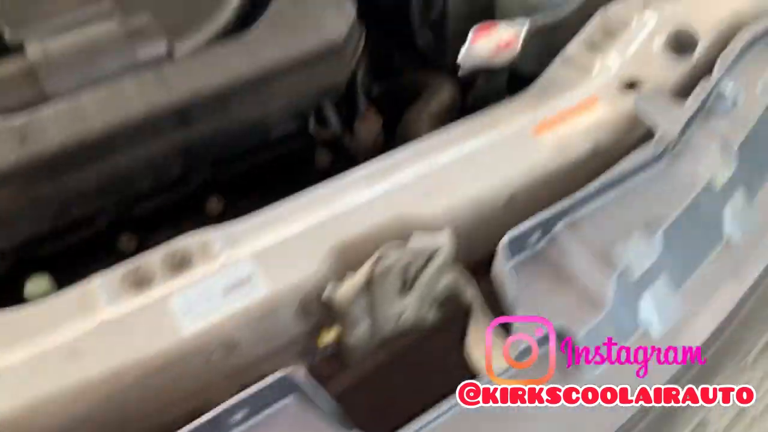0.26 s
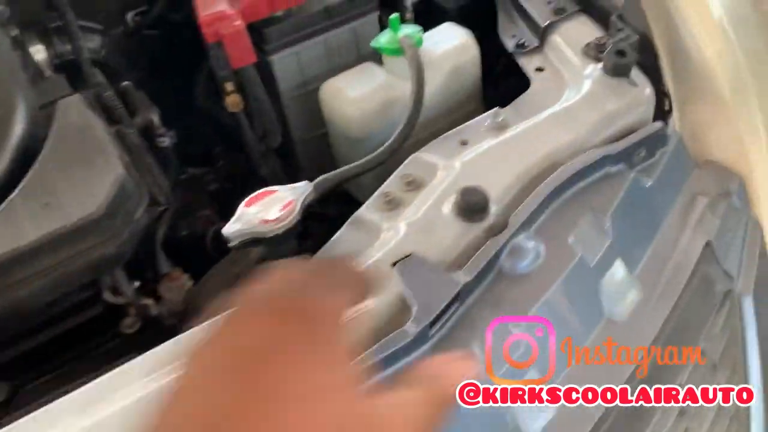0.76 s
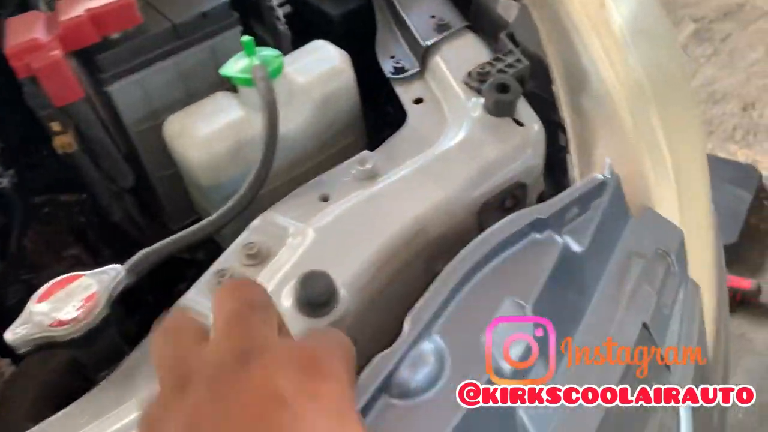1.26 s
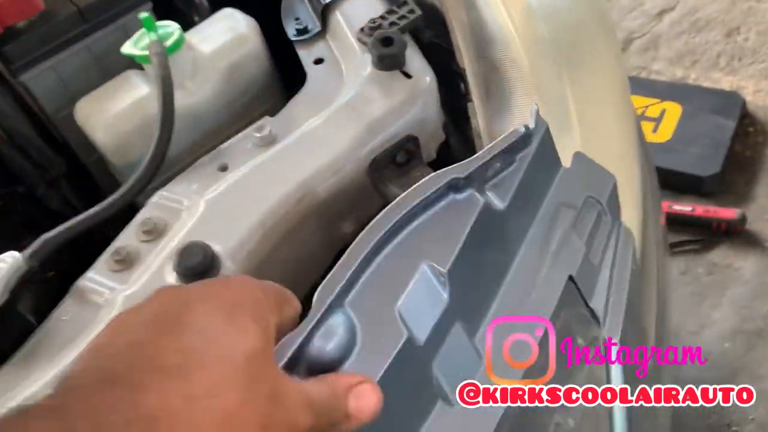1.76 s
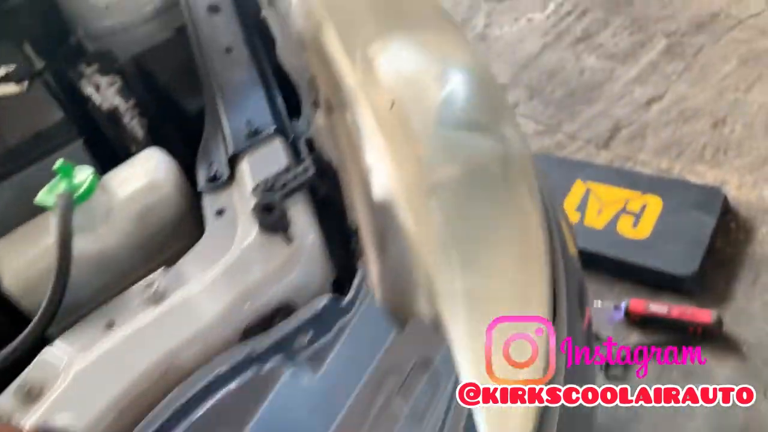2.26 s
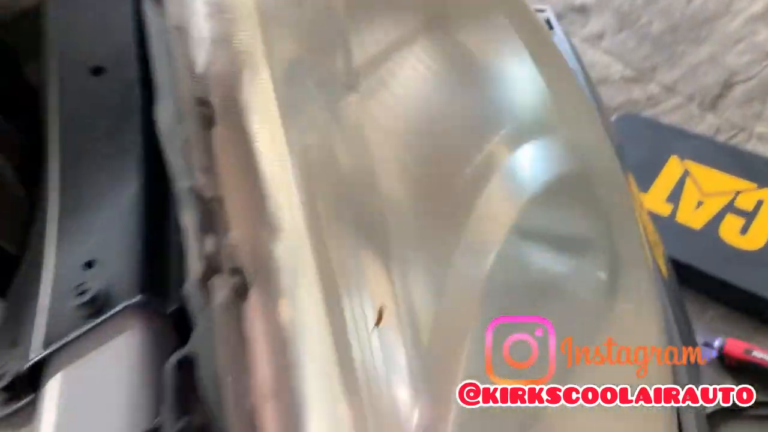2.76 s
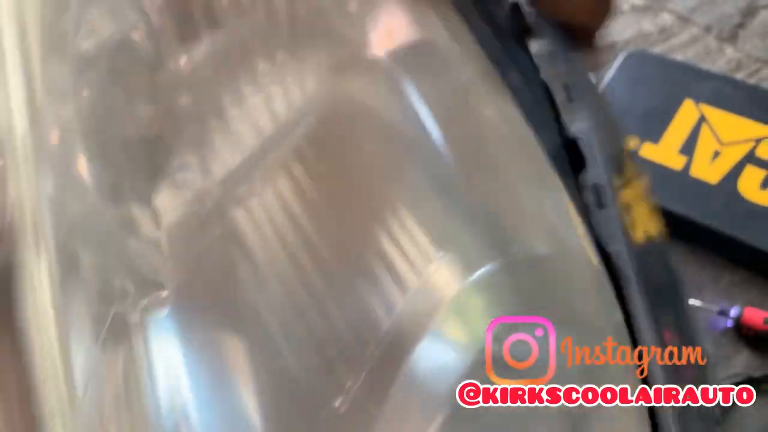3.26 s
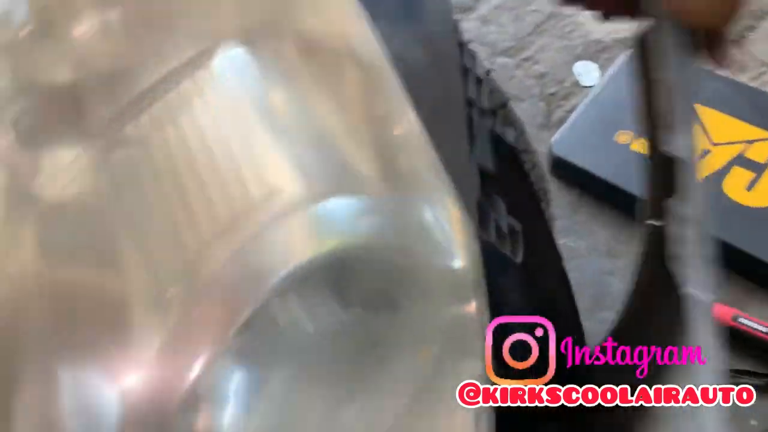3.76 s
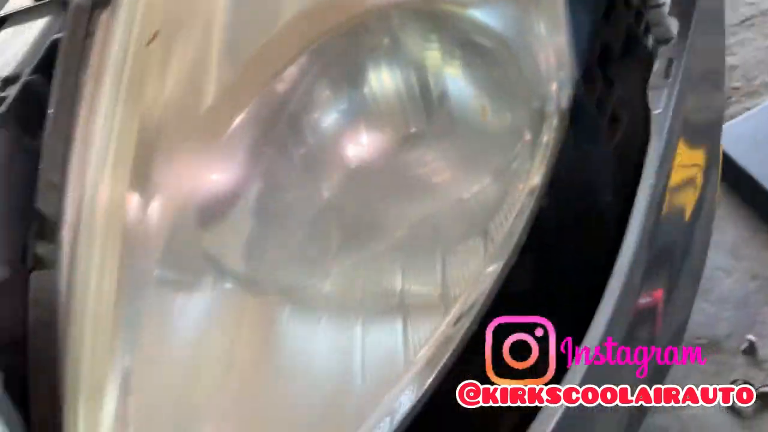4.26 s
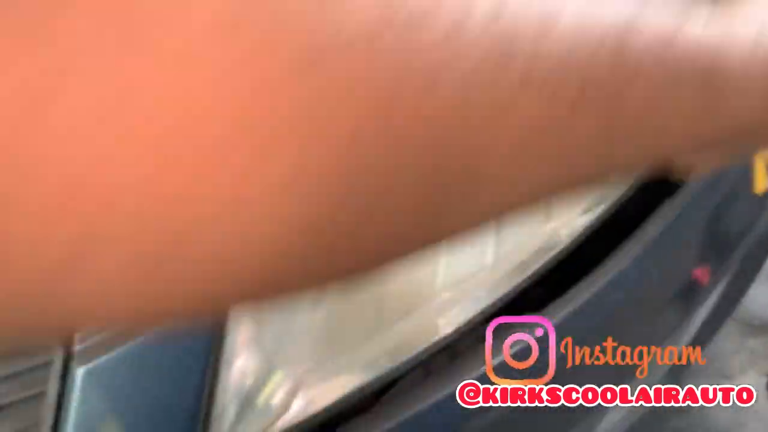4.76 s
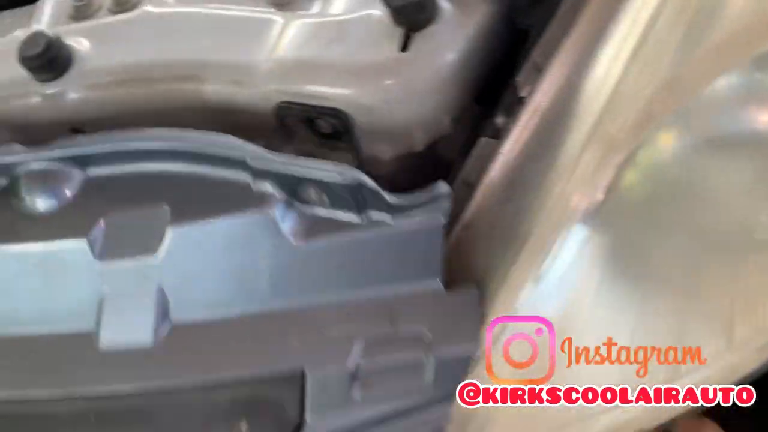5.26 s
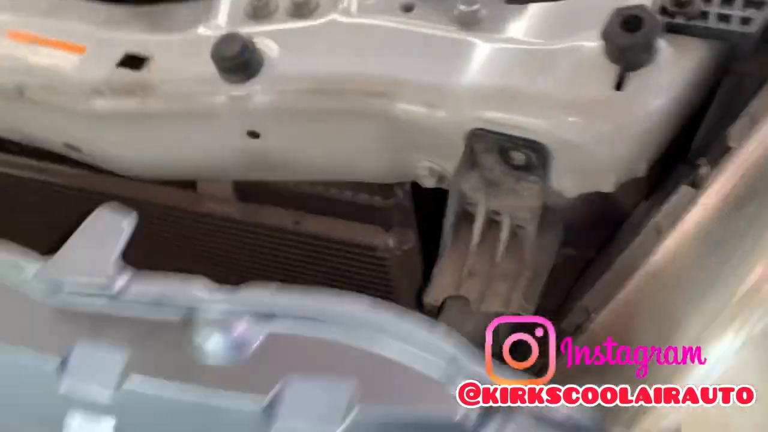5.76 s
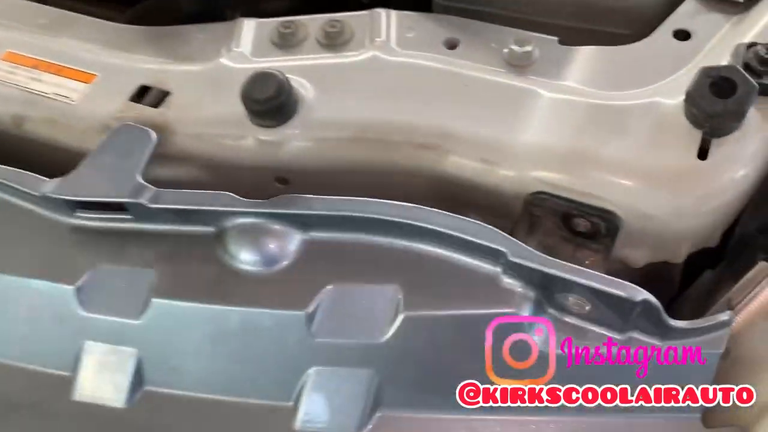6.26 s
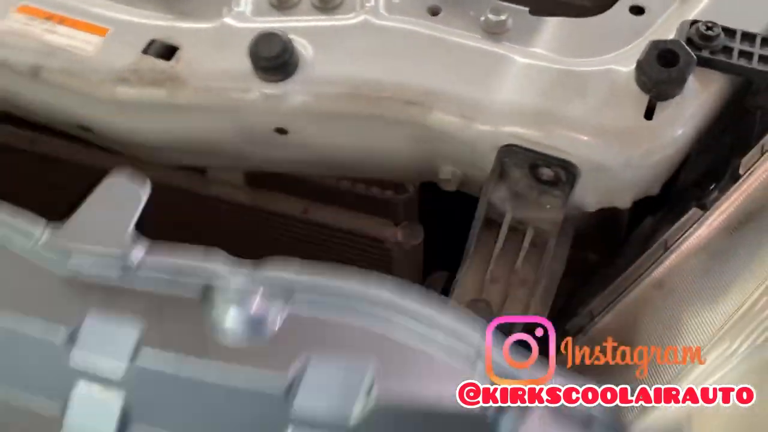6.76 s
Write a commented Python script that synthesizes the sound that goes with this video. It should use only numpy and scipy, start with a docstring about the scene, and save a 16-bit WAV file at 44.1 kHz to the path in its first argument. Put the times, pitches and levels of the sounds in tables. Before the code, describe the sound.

Stiff hollow plastic is handled right beside a small hand-held microphone in a workshop. Soft taps and faint scrapes give way to a thin squeaky rub and small finger ticks. Midway the panel clatters sharply in a fast irregular cluster, then a taut spot pops loudest of all. Later knocks are sparser, mixed with dull floppy thuds, cloth rustle and low rumble, with short reflections.

```python
"""Bumper cover worked loose

A plastic bumper cover is worked loose from its clips by hand in a garage, heard close up through a hand-held phone.
Clips snap and ring decaying shell modes, the loose panel flexes with falling low thumps and one tight pop,
edges scrape as coloured noise, and skin slips on smooth plastic in trains of tiny bursts that squeak or tick.
Handling rumble, rustling, a sleeve and quiet workshop air lie underneath, all of them filtered noise."""
import sys
import numpy as np
from scipy import signal
from scipy.fft import rfft, irfft
from scipy.io import wavfile
from scipy.ndimage import uniform_filter1d

SR = 44100
rng = np.random.default_rng(int(sys.argv[2]) if len(sys.argv) > 2 else 0)


def to_wav(sig):
    """Store sig (one row per channel, or 1-D mono) as 16-bit WAV at the path in sys.argv[1].

    Samples outside -1..1 are clipped; the rate is SR.
    """
    pcm = np.clip(np.atleast_2d(sig), -1, 1) * 32767
    pcm = np.round(pcm).astype(np.int16)
    wavfile.write(sys.argv[1], SR, pcm.T)  # frames by channels


N = 309141
TIME = np.arange(N) / SR
AGE = TIME[:SR // 2]  # seconds since the start of one event
FREQS = np.fft.rfftfreq(N, 1 / SR) + 1e-3

# How hard the cover is worked, as the level of its handling noise. Each row: time in seconds, level in dB.
EFFORT = [(0.0, -53), (0.76, -55.5), (0.94, -58), (1.4, -54), (2.75, -55), (2.96, -62), (3.2, -52.5),
          (3.35, -39), (3.46, -49), (3.57, -37.5), (3.72, -55), (3.84, -50.5), (4.27, -53.5), (4.62, -44),
          (4.76, -58.5), (5.24, -53.5), (5.42, -46.5), (5.69, -53.5), (6.08, -45.5), (7.0, -50)]
REST_DB = -55  # that level while the cover is only held
# Spectra of the noises. Each row: frequency in Hz, relative level in dB.
RUSTLE_COLOUR = [(300, -4.5), (700, -2.5), (1100, -6), (1500, -6.5), (2500, -14.5), (3800, -22.5),
                 (5500, -47), (9000, -27.5)]
MURMUR_COLOUR = [(100, -10.5), (170, 2.5), (240, 5), (280, -0.5), (325, 7), (400, -4.5), (550, -5),
                 (900, -55.5)]
SLEEVE_COLOUR = [(1500, 3), (4500, -0.5), (7000, 3), (11000, 6.5), (13000, 4.5), (15500, -2)]
RUMBLE_COLOUR = [(20, -45.5), (32, -17), (45, 6), (62, 12), (85, 8.5), (125, 4.5), (170, -3.5), (300, -48)]
AIR_COLOUR = [(40, 10), (120, -6.5), (330, -14.5), (600, -7), (1200, -35), (2500, -16.5), (4000, -19),
              (5500, -25.5), (7000, -14), (9000, -85), (16000, -41)]
SCRAPE_COLOUR = [(120, -7), (300, 6), (700, 2), (1050, -5.5), (1500, -8), (2300, -12.5), (3800, -16.5),
                 (5500, -23), (9000, -36)]
SLIP_COLOUR = [(3000, -77), (5500, -31), (7500, -18.5), (9300, -3), (11000, 3.5), (12300, 2.5), (13500, 8),
               (15500, 0), (17000, 7.5)]
CRACK_COLOUR = [(300, -26), (800, 13), (1500, 3.5), (2400, 1), (4200, -17.5), (6000, -27), (12000, -17)]
SNAP_COLOUR = [(800, -6), (2500, 6.5), (4200, 4.5), (7000, 5), (11000, 7), (16000, -5)]
# The arm sweeping past the phone. Each row: centre in seconds, spread (sigma) in seconds, level in dB.
STROKES = [(0.45, 0.13, -62.5), (1.228, 0.019, -56.5), (1.324, 0.013, -59), (1.88, 0.15, -55.5),
           (2.877, 0.053, -52.5), (3.07, 0.05, -55.5), (3.993, 0.11, -53), (4.503, 0.14, -56),
           (4.837, 0.18, -50), (5.326, 0.061, -48.5), (6.42, 0.11, -54), (6.87, 0.091, -56)]
# Edges dragging over their brackets. Each row: centre in seconds, spread (sigma) in seconds, grind in dB
# and hiss in dB (both before trim), resonance of the edge in Hz, its level in dB.
SCRAPES = [(0.28, 0.036, -70, -50.5, 890, -82), (0.513, 0.021, -69, -53, 1000, -73),
           (0.693, 0.019, -43.5, -49.5, 1390, -72), (0.87, 0.031, -58, -55.5, 380, -48),
           (1.38, 0.024, -48.5, -78, 345, -40.5), (1.453, 0.016, -44, -51.5, 353, -44),
           (1.95, 0.027, -62, -72, 408, -53), (2.12, 0.042, -53.5, -63, 725, -60),
           (2.286, 0.014, -60, -62, 414, -50.5), (2.338, 0.011, -52, -66, 436, -52),
           (2.382, 0.018, -53, -47, 1800, -61), (3.279, 0.014, -44, -43, 596, -33),
           (3.53, 0.017, -42, -34, 3500, -52), (3.6, 0.0075, -48, -44, 600, -41),
           (3.776, 0.015, -40.5, -43, 2380, -55), (4.145, 0.022, -44.5, -53.5, 1610, -55.5),
           (4.214, 0.021, -66, -47.5, 1450, -45), (4.236, 0.035, -39, -44, 2040, -46.5),
           (4.454, 0.016, -47, -65, 950, -51), (4.524, 0.032, -35, -47, 1390, -54),
           (5.28, 0.024, -41, -57, 1090, -50.5), (6.115, 0.012, -46.5, -54.5, 1400, -72),
           (6.177, 0.015, -43, -63, 1430, -50), (6.661, 0.024, -43.5, -52, 1420, -63)]
# Clips and edges striking the shell. Each row: start in seconds, body level in dB, panel pitch in Hz, crack
# level in dB, snap level in dB, base ring time in seconds, pitch of the struck spot in Hz, its level in dB;
# levels are before each layer's trim, and body, crack and spot scale the ring time while the snap keeps its
# own.
KNOCKS = [(0.433, -56, 300, -40, -66, 0.062, 960, -46), (0.525, -56, 420, -33.5, -44, 0.028, 900, -51),
          (0.568, -33, 362, -35, -58, 0.034, 800, -27.5), (0.5799, -36, 398, -39, -40, 0.025, 1000, -43),
          (0.6544, -36, 330, -38.5, -38.5, 0.1, 2280, -32.5),
          (0.6596, -37, 382, -47, -54, 0.038, 1130, -53), (0.677, -41, 333, -62, -60, 0.11, 1280, -40),
          (0.703, -39.5, 490, -52, -56, 0.087, 925, -57), (1.137, -37.5, 332, -74, -78, 0.19, 644, -45),
          (1.211, -51, 314, -55, -57, 0.15, 3400, -62), (1.241, -69, 300, -50.5, -55, 0.073, 2950, -52),
          (1.369, -34.5, 312, -66, -72, 0.18, 610, -39), (1.4, -39.5, 292, -46, -74, 0.28, 1110, -57),
          (1.627, -39, 298, -70, -72, 0.25, 957, -43.5), (1.811, -42, 334, -46, -54, 0.09, 740, -37),
          (2.412, -56, 332, -53, -53.5, 0.12, 1005, -44.5), (2.817, -42, 329, -68, -65, 0.39, 590, -48),
          (3.2574, -50, 330, -47, -40, 0.03, 2650, -37), (3.268, -41, 500, -50, -40, 0.056, 2430, -39),
          (3.2949, -17, 336, -30, -27.5, 0.11, 700, -20.5),
          (3.3085, -19.5, 295, -36.5, -42, 0.17, 606, -23), (3.33, -28, 334, -42, -45, 0.12, 700, -36),
          (3.3437, -43, 395, -50, -46, .1, 604, -40), (3.394, -57, 320, -42.5, -41, 0.14, 1015, -34),
          (3.4401, -32, 333, -59, -66, 0.057, 630, -43), (3.492, -32.5, 294, -56, -37.5, 0.11, 640, -44),
          (3.516, -34, 313, -44, -56, .06, 700, -47), (3.5219, -40, 420, -46, -49, .04, 4200, -57),
          (3.5288, -26.5, 347, -49, -57, 0.084, 720, -31), (3.54, -29, 284, -55, -52, 0.15, 654, -41),
          (3.554, -29, 400, -46, -57, 0.078, 1430, -40), (3.5695, -26, 435, -31, -39, 0.097, 690, -20.5),
          (3.581, -28.5, 294, -41, -60, 0.11, 810, -29), (3.606, -35.5, 355, -44, -63, 0.068, 760, -43),
          (3.671, -38, 460, -35.5, -46, 0.039, 720, -19.5), (3.688, -41, 420, -53, -62, 0.051, 885, -32.5),
          (3.7382, -38.5, 684, -48, -37, 0.027, 4160, -39), (3.782, -29, 322, -44, -53, 0.2, 682, -33),
          (3.794, -37, 340, -49, -62, 0.097, 890, -46), (3.808, -31.5, 370, -43, -46.5, 0.055, 810, -31.5),
          (3.989, -29.5, 307, -37, -46, 0.19, 630, -37), (4.496, -23, 260, -23.5, -31, 0.075, 2310, -25.5),
          (4.5092, -36, 300, -31, -38, .06, 1450, -29), (4.526, -34.5, 347, -44, -46, .06, 810, -44),
          (4.599, -52, 400, -47, -59, 0.012, 3730, -41), (4.695, -33.5, 317, -28.5, -60, 0.12, 2210, -33.5),
          (5.3255, -27.5, 458, -34.5, -58, 0.11, 1450, -31), (5.3451, -32, 297, -38, -42.5, .05, 1730, -34),
          (5.356, -26.5, 331, -32, -44, 0.17, 820, -46), (5.392, -35.5, 294, -56, -62, 0.092, 600, -54),
          (5.787, -29.5, 492, -32, -47, 0.13, 1880, -35.5), (6.1502, -37, 458, -42, -48, 0.078, 1370, -37),
          (6.1591, -36.5, 350, -34.5, -29, 0.055, 1990, -44),
          (6.6965, -24.5, 454, -39, -56, 0.08, 1410, -28), (6.704, -32, 344, -49, -51, 0.093, 1960, -47),
          (6.717, -32, 235, -44, -64, 0.12, 1256, -43)]
# Shell resonances, before scatter and detuning. Each row: frequency in Hz, level in dB, t60 in seconds.
SHELL = [(183.6, 1, 0.48), (251.7, 8.5, 0.22), (300.3, 5, 0.38), (339, 4, 0.26), (431, 5, 0.12),
         (502, -1, 0.25), (582, -2.5, 0.063), (735, 2.5, 0.13), (838, 10, 0.02), (990, -6, 0.12),
         (995, 6, 0.0083), (1510, -4, 0.097), (2670, 15.5, 0.017), (2950, 15, 0.013)]
# A clip's own ring, before scatter and detuning. Each row: frequency in Hz, level in dB, t60 in seconds.
CLIP = [(1466, 5, 0.025), (1974, -4.5, 0.064), (2600, -3, 0.02), (3600, -3, .032), (4180, -2, 0.018),
        (6050, -2.5, 0.027), (7000, 0.5, 0.06)]
BITE_DB, BITE_S = 3, 0.00088  # the first contact of a blow is the hardest
PUSH_S, SETTLE_S = 0.065, 0.098  # force builds before a blow; the panel settles after it
# Second mode of a broad panel and of a small tab, as multiples of the first.
PANEL_OVERTONE, TAB_OVERTONE = 1.716, 1.573
# The loose panel flexing. Each row: start in seconds, level in dB before trim, first pitch in Hz,
# settled pitch in Hz, t60 in seconds.
THUMPS = [(0.439, -24, 111, 62, 0.12), (0.585, -24.5, 170, 105, 0.11), (0.844, -25.5, 270, 69.5, 0.098),
          (1.386, -28, 170, 112, 0.14), (1.952, -32, 149, 92.5, 0.11), (2.105, -35, 160, 100, 0.092),
          (2.274, -30, 169, 90, 0.16), (2.304, -40, 190, 99, 0.055), (2.817, -29, 621, 240, 0.17),
          (2.888, -22.5, 100, 64.4, 0.075), (3.128, -15.5, 89.5, 68.6, 0.064), (3.21, -20, 470, 149, 0.043),
          (3.33, -20, 200, 120, 0.05), (3.351, -19, 367, 250, 0.063), (3.373, -17, 150, 95, 0.062),
          (3.439, -37, 444, 233, 0.03), (3.515, -27, 220, 128, 0.052), (3.574, -19.5, 161, 80, 0.086),
          (3.825, -20.5, 153, 117, 0.048), (3.994, -20.5, 246, 99, 0.071), (4.497, -23.5, 280, 171, 0.064),
          (4.601, -15, 668, 83, 0.1), (4.656, -16, 230, 77, 0.068), (5.173, -31, 202, 106, 0.076),
          (5.367, -16.5, 205, 124, 0.042), (5.524, -21, 275, 102, 0.13), (5.602, -24, 109, 66.5, 0.086),
          (5.795, -16.5, 212, 90, 0.08), (5.899, -19.5, 204, 86, 0.12), (5.915, -13.5, 330, 108, 0.027),
          (6.0, -22.5, 101, 62, 0.14), (6.39, -29.5, 393, 256, 0.14), (6.725, -14, 137.4, 61.5, 0.05),
          (6.745, -16.5, 100, 68.4, 0.087), (6.916, -27, 119, 73.6, 0.066), (6.974, -29.5, 130, 107, 0.18)]
# Partials of a brief rubbing squeal. Each row: mid frequency in Hz, relative level in dB, rise in Hz per second.
SQUEAL = [(1540, 5, 3), (2270, 2, 9000)]
# Skin sliding on smooth plastic, one list per slide. Each row: time in seconds, slips per second,
# level in dB before trim.
SLIDES = [
    [(1.8, 970, -52), (1.86, 1400, -45), (1.9, 1850, -31.5), (1.96, 1500, -26.5), (2.03, 1400, -25),
     (2.08, 1640, -24), (2.13, 1440, -28), (2.17, 2300, -37.5), (2.2, 1560, -47), (2.27, 820, -57)],
    [(2.907, 240, -27), (2.922, 690, -25), (2.94, 860, -22.5), (2.962, 610, -28), (2.99, 180, -29.5),
     (3.015, 118, -33.5), (3.04, 117, -32.5), (3.066, 150, -27), (3.078, 104, -30)],
]
# Single slips. Each row: start in seconds, peak level in dB before trim, ring of the touched spot in Hz.
SLIPS = [(2.9028, -23, 11100), (3.085, -25, 10400), (3.1, -24, 10400), (3.1207, -22, 10500),
         (3.139, -24.5, 10800), (3.173, -24.5, 11500), (3.392, -23.5, 10900), (3.865, -25, 14900),
         (3.887, -26, 14800), (3.921, -27.5, 14800), (3.9476, -29, 14600), (3.9639, -27, 14500),
         (3.9758, -24.5, 14800), (3.989, -28, 14800), (4.022, -31, 14800)]
# A taut spot popping through: start in seconds, level in dB, first pitch in Hz, settled pitch in Hz, t60 in seconds.
POP = (4.6001, -4.5, 840, 560, .022)
# The left and right channels. Each row: frequency in Hz, left minus right in dB, left lead in radians.
STEREO_LEAN = [(20, 0, 0), (300, 0, .25), (540, 0, .95), (740, 6, 1.9), (860, 9, 1.3), (1000, 7, 0),
               (1250, 5, -1.3), (1700, 6, -.9), (2100, 10, -.7), (2400, 10, -3.9), (3100, 9, -3.7),
               (3700, 11, -6.2), (4500, 8, -6.2), (4850, 5, -9.3), (5300, 0, -9.6), (5800, 0, -12.1),
               (6600, 0, -12.7), (8500, 0, -15.7), (11000, 0, -18.85), (13400, 0, -22), (15500, 0, -25.1)]
TOP_HZ = 15750  # upper limit of the sound


def undb(db):
    """Decibels to gain."""
    return 10 ** (np.asarray(db) / 20)


def unit(x):
    """Scale to rms 1."""
    return x / np.sqrt(np.mean(x ** 2) + 1e-20)


def loudest(x):
    """Scale so that the loudest 10 ms have rms 1."""
    return x / np.sqrt(uniform_filter1d(x ** 2, SR // 100).max())


def add(out, s, x):
    """Mix x into out from time s."""
    i = max(int(s * SR), 0)
    out[i:i + len(x)] += x[:max(N - i, 0)]


def colour(x, points):
    """Causal minimum-phase filter with the spectrum of (Hz, dB) points, of unit energy."""
    hz, db = np.transpose(points)
    grid = np.fft.rfftfreq(8192, 1 / SR) + 1
    cepstrum = irfft(np.log(undb(np.interp(np.log(grid), np.log(hz), db))))
    # folding the cepstrum onto positive time makes the response causal
    half = len(cepstrum) // 2
    cepstrum[1:half] *= 2
    cepstrum[half + 1:] = 0
    response = irfft(np.exp(rfft(cepstrum)))
    return signal.fftconvolve(x, response / np.linalg.norm(response))[:len(x)]


def band(x, lo_hz, hi_hz):
    """Band-pass with gentle skirts."""
    return signal.sosfilt(signal.butter(2, [lo_hz, min(hi_hz, SR / 2 - 500)], "band", fs=SR, output="sos"), x)


def fade(t60):
    """Exponential decay over the life of one event."""
    return np.exp(-np.log(1000) * AGE / max(t60, .001))


def swell(s, half_s):
    """A smooth bell-shaped stroke centred on time s."""
    return np.exp(-.5 * ((TIME - s) / half_s) ** 2)


def walk(rate):
    """Random line with a spread near 1, through rate new values a second; it holds after 4096 values."""
    knots = rng.standard_normal(4096)
    return np.interp(TIME * rate, np.arange(len(knots)), knots)


def friction(points, grain_db, flicker_db, flicker_rate):
    """Countless tiny catches of uneven size under a wavering pressure."""
    uneven_db = grain_db * walk(500) + flicker_db * walk(flicker_rate)
    return unit(colour(rng.standard_normal(N) * undb(uneven_db), points))


def spread(source, width_db):
    """A broad source: the two microphones hear most of it alike and a part in opposition."""
    side = undb(width_db) * source()
    return (source() + np.array([side, -side])) / np.hypot(1, undb(width_db))


def worked(db, slope):
    """Gain of a noise that has level db at rest and grows by slope dB per dB of effort."""
    return undb(db + slope * (np.interp(TIME, *np.transpose(EFFORT)) - REST_DB))


def shaken(blows):
    """How much the panel moves around its blows, each in proportion to its strength."""
    power = 0
    for s, db, *_ in blows:
        push_and_settle = np.exp(np.minimum((TIME - s) / PUSH_S, (s - TIME) / SETTLE_S))
        power = power + (undb(db) * push_and_settle) ** 2
    return np.sqrt(power)


def rubbing(rustle_db=-57, rustle_slope=0.45, murmur_db=-52, murmur_slope=0.63, stir_db=-22):
    """The cover rustles against the car and its shell stirs, both with effort; knocks stir the shell further."""
    rustle = spread(lambda: friction(RUSTLE_COLOUR, grain_db=3, flicker_db=2, flicker_rate=40), width_db=-8)
    murmur = spread(lambda: friction(MURMUR_COLOUR, grain_db=1, flicker_db=2.5, flicker_rate=20), width_db=-9)
    stir = np.hypot(worked(murmur_db, murmur_slope), undb(stir_db) * shaken(KNOCKS))
    return rustle * worked(rustle_db, rustle_slope) + murmur * stir


def sleeve(rest_db=-66, slope=0.88):
    """Cloth brushes faintly all along and swells as the arm sweeps past."""
    strokes = sum(undb(db) * swell(s, half_s) for s, half_s, db in STROKES)
    cloth = spread(lambda: friction(SLEEVE_COLOUR, grain_db=1.5, flicker_db=1, flicker_rate=25), width_db=-17)
    return cloth * np.hypot(worked(rest_db, slope), strokes)


def rumble(rumble_db=-43, rumble_slope=0.35, flop_db=-18):
    """Low rumble: a little from the grip, more each time the panel flops."""
    noise = spread(lambda: friction(RUMBLE_COLOUR, grain_db=2, flicker_db=2.5, flicker_rate=18), width_db=-6)
    return noise * np.hypot(worked(rumble_db, rumble_slope), undb(flop_db) * shaken(THUMPS))


def workshop_air(air_db=-54):
    """Steady coloured noise, independent on each side, stands for the quiet air of the workshop."""
    return undb(air_db) * np.array([unit(colour(rng.standard_normal(N), AIR_COLOUR)) for _ in range(2)])


def scrapes(grind_db=-2, hiss_db=-2, sing_width=1.26, catch_db=3):
    """Each edge grinds in the shell and hisses at the contact; uneven catches ring its own resonance."""
    grind = friction(SCRAPE_COLOUR, grain_db=4, flicker_db=2, flicker_rate=110)
    hiss = friction(SLEEVE_COLOUR, grain_db=3, flicker_db=2, flicker_rate=130)
    catches = rng.standard_normal(N) * undb(catch_db * np.minimum(walk(700), 1.5))
    out = np.zeros(N)
    for s, half_s, db, top_db, hz, edge_db in SCRAPES:
        singing_edge = unit(band(catches, hz / sing_width, hz * sing_width))
        drag = undb(db + grind_db) * grind + undb(top_db + hiss_db) * hiss + undb(edge_db) * singing_edge
        out += swell(s, half_s) * drag
    return out


def struck(modes, scatter_db, detune):
    """Ring a table of modes: every contact point favours other ones, and bending detunes them a little."""
    out = np.zeros(len(AGE))
    for hz, db, t60 in modes:
        size, side, bend = rng.standard_normal(3)
        tone = np.sin(2 * np.pi * hz * (1 + detune * bend) * AGE)
        out += undb(db + scatter_db * size) * np.sign(side) * fade(t60) * tone
    return out


def two_modes(hz, t60, ratio, overtone_db, stretch, relax_s):
    """A main mode and a shorter overtone; both start sharp while the plastic is still bent."""
    phase = 2 * np.pi * np.cumsum(hz * (1 + stretch * np.exp(-AGE / relax_s))) / SR
    return np.sin(phase) * fade(t60) + undb(overtone_db) * np.sin(ratio * phase) * fade(0.62 * t60)


def contact_noise(strike_db=18):
    """Four noises of one blow: a clip lets go in a cluster of tiny contacts of uneven force."""
    uneven_db = 3 * np.minimum(walk(600)[:len(AGE)], 2)
    force = undb(uneven_db + BITE_DB * np.exp(-AGE / BITE_S))
    noise = rng.standard_normal((4, len(AGE))) * force
    noise[1:3, 0] += undb(strike_db)  # crack and snap open with one sharp tick
    return noise


def shell_body(modes, noise, panel_hz, ring, dense_db=-6, panel_db=6, build_s=0.00089):
    """Main shell modes, a thicket of small ones and the panel around the blow build up together."""
    main = loudest(band(modes, 205, 676)) * fade(4 * ring)
    thicket = loudest(band(noise * fade(ring), 234, 663))
    panel = two_modes(panel_hz, 0.46 * ring, PANEL_OVERTONE, overtone_db=-6.5, stretch=0.13, relax_s=0.0057)
    body = main + undb(dense_db) * thicket + undb(panel_db) * loudest(panel)
    return body * (1 - np.exp(-AGE / build_s))


def crack(modes, noise, chatter, ring):
    """The middle of a blow: a crunch of contacts over the upper shell modes."""
    crunch = colour(noise * fade(0.58 * ring) + chatter, CRACK_COLOUR)
    return 0.61 * loudest(band(modes, 290, 7000)) * fade(ring) + loudest(crunch)


def snap(noise, chatter, snap_t60=0.041, clip_db=-4):
    hiss = colour(noise * fade(snap_t60) + 0.16 * chatter, SNAP_COLOUR)
    return loudest(hiss) + undb(clip_db) * loudest(struck(CLIP, scatter_db=2.5, detune=0.013))


def struck_spot(hz, ring):
    """Small stiff tabs ring higher and shorter than broad panels."""
    t60 = 0.38 * ring * np.sqrt(600 / hz)
    return two_modes(hz, t60, TAB_OVERTONE, overtone_db=-9.5, stretch=0.0067, relax_s=0.0037)


def knocks(crack_db=-2, snap_db=-1, spot_db=-4, chatter_db=-19, chatter_t60=0.43):
    """Each blow rings shell, clip and struck spot; the treble dies early and loose edges chatter on."""
    out = np.zeros(N)
    for s, body_level, panel_hz, crack_level, snap_level, ring, spot_hz, spot_level in KNOCKS:
        noise = contact_noise()
        modes = struck(SHELL, scatter_db=4, detune=.04)
        chatter = undb(chatter_db) * fade(chatter_t60) * noise[3]
        layers = [(body_level, shell_body(modes, noise[0], panel_hz, ring)),
                  (crack_level + crack_db, crack(modes, noise[1], chatter, ring)),
                  (snap_level + snap_db, snap(noise[2], chatter)),
                  (spot_level + spot_db, struck_spot(spot_hz, ring))]
        for db, layer in layers:
            add(out, s, undb(db) * loudest(layer))
    return out


def flex(db, first_hz, settled_hz, t60, glide_s, rise_s):
    """Short bending waves travel fastest, so the pitch drops as the panel settles."""
    hz = settled_hz + (first_hz - settled_hz) * np.exp(-AGE / glide_s)
    tone = np.sin(2 * np.pi * np.cumsum(hz) / SR)
    return undb(db) * tone * fade(t60) * (1 - np.exp(-AGE / rise_s))


def thumps(thump_db=3):
    """The loose panel flops: each thump is one decaying tone of falling pitch."""
    out = np.zeros(N)
    for s, db, first_hz, settled_hz, t60 in THUMPS:
        add(out, s, flex(db + thump_db, first_hz, settled_hz, t60, glide_s=0.00483, rise_s=0.0054))
    return out


def squeal(at_s=1.688, half_s=0.014, squeal_db=-44, hiss_db=-44):
    """A dragged tab sings roughly, its lower partial steady and its upper one rising, both under random jitter."""
    since = np.clip(TIME - at_s, -2 * half_s, half_s)
    tone = np.zeros(N)
    for mid_hz, db, rise in SQUEAL:
        hz = mid_hz + rise * since + 28 * walk(900)
        tone += undb(db) * np.sin(2 * np.pi * np.cumsum(hz) / SR)
    hiss = friction(SLEEVE_COLOUR, grain_db=3, flicker_db=1.5, flicker_rate=60)
    return (undb(squeal_db) * unit(tone) + undb(hiss_db) * hiss) * swell(at_s, half_s)


def reflections(x, db, t60, lo_hz, hi_hz):
    """A diffuse tail, different on each side, that keeps changing as phone and cover move."""
    out, size = np.zeros((2, N)), SR // 2
    # overlapping half-second pieces, each with fresh tails
    for i in range(0, N, size // 2):
        piece = x[i:i + size] * signal.windows.cosine(size)[:N - i]
        tails = band(rng.standard_normal((2, len(AGE))) * fade(t60) * (AGE > .002), lo_hz, hi_hz)
        for side, tail in zip(out, tails):
            add(side, i / SR, signal.fftconvolve(piece, tail / np.linalg.norm(tail)))
    return undb(db) * out


def release(t60, grit_db=4):
    """Skin lets go once: a click and a 10 ms burst of grit, of unit energy."""
    grit = rng.standard_normal(SR // 100) * fade(t60)[:SR // 100]
    burst = signal.unit_impulse(len(grit)) + undb(grit_db) * grit / np.linalg.norm(grit)
    return burst / np.linalg.norm(burst)


def slips(slide_db=2, slip_db=-4, jitter=0.12, release_t60=0.004, grip_db=1, ring_db=-4, ring_t60=0.086):
    """Skin sticks and lets go: fast slips fuse into a hiss, slow ones tick; all ring the same thin plastic."""
    out, grip = np.zeros(N), grip_db * walk(90)  # the grip wavers
    for s, db, hz in SLIPS:
        ping = band(release(release_t60), hz / 1.08, hz * 1.08)
        tick = 0.73 * release(release_t60) + .8 * ping / np.linalg.norm(ping)
        add(out, s, undb(db + slip_db) * np.sqrt(SR * release_t60) * tick)
    for rows in SLIDES:
        times, rates, levels = np.transpose(rows)
        s = times[0]
        while s < times[-1]:
            rate = max(np.interp(s, times, rates), 20)
            size, wait = rng.standard_normal(2)
            db = np.interp(s, times, levels) + slide_db + grip[int(s * SR)] + 1.2 * size
            # sqrt(SR / rate) keeps the power steady when slips come faster
            add(out, s, undb(db) * np.sqrt(SR / rate) * release(release_t60))
            s += np.exp(jitter * wait) / rate
    # the many close modes of the plastic ring on after each slip
    ring = rng.standard_normal(len(AGE)) * fade(ring_t60)
    rung = signal.fftconvolve(out, ring / np.linalg.norm(ring))[:N]
    ticks = colour(out + undb(ring_db) * rung, SLIP_COLOUR) / np.hypot(1, undb(ring_db))
    return ticks + reflections(ticks, db=-18, t60=.055, lo_hz=4000, hi_hz=17000)


def pop():
    """A taut spot pops through right beside the phone: one tight tock of fast-falling pitch."""
    out = np.zeros(N)
    add(out, POP[0], flex(*POP[1:], glide_s=.004, rise_s=.0004))
    return out


def scene():
    """Contacts arrive directly and via engine bay and walls; handling noise and workshop air lie all around."""
    beds = rubbing() + sleeve() + rumble() + workshop_air()
    contacts = scrapes() + knocks() + thumps() + squeal()
    skin, tock = slips(), pop()
    engine_bay = reflections(contacts, db=-7, t60=.04, lo_hz=500, hi_hz=6000)
    walls = reflections(contacts + .2 * tock, db=-20, t60=0.31, lo_hz=77.5, hi_hz=3880)
    return beds + contacts + skin + tock + engine_bay + walls


def record(dry, left_share=0.36):
    """The stereo image leans left in the middle range, its channel phase varies with frequency; the top is cut."""
    hz, lean_db, lead = np.transpose(STEREO_LEAN)
    lean_db, lead = np.interp(FREQS, hz, lean_db), np.interp(FREQS, hz, lead)
    # the lean is part boost on the left, part cut on the right
    left = rfft(dry[0]) * undb(left_share * lean_db) * np.exp(.5j * lead)
    right = rfft(dry[1]) * undb((left_share - 1) * lean_db) * np.exp(-.5j * lead)
    stereo = irfft(np.array([left, right]), N)
    return signal.sosfilt(signal.ellip(10, .2, 80, TOP_HZ, fs=SR, output="sos"), stereo)


dry = scene()
out = record(dry)
to_wav(out)
```